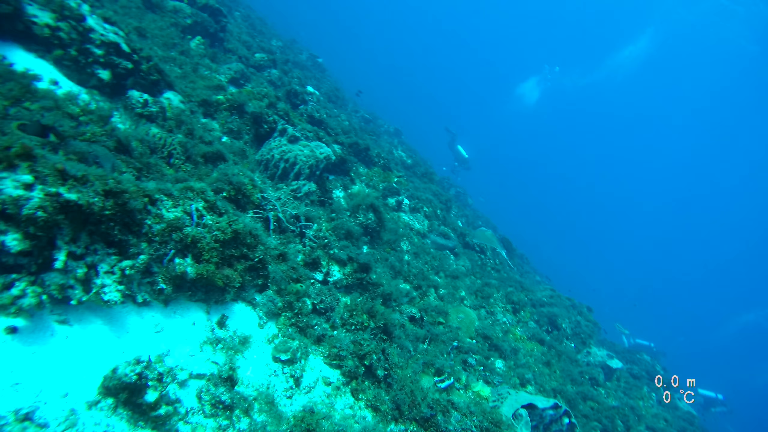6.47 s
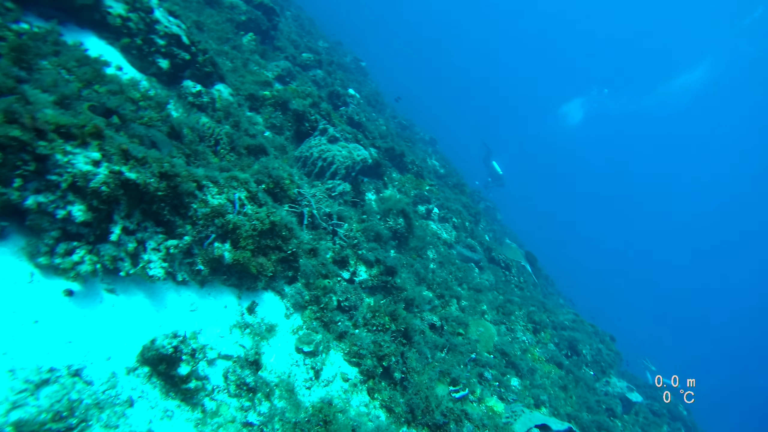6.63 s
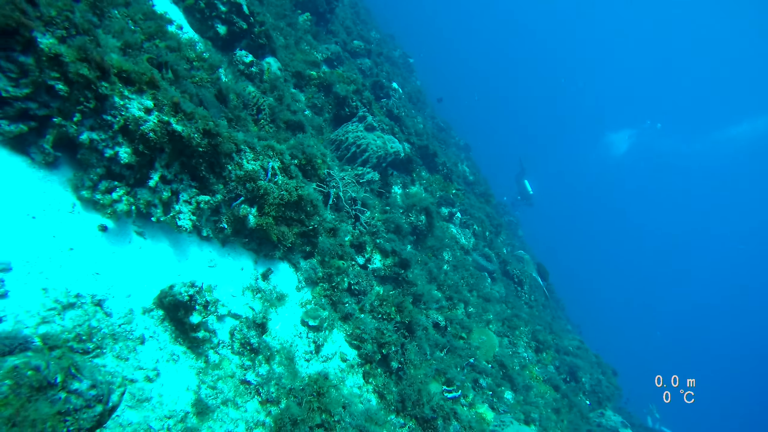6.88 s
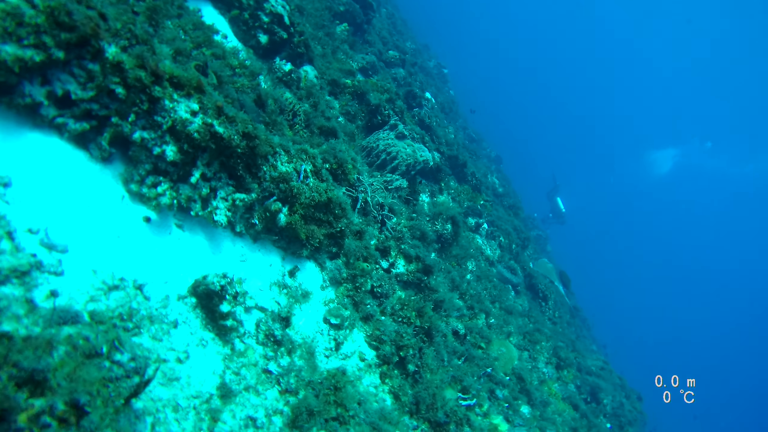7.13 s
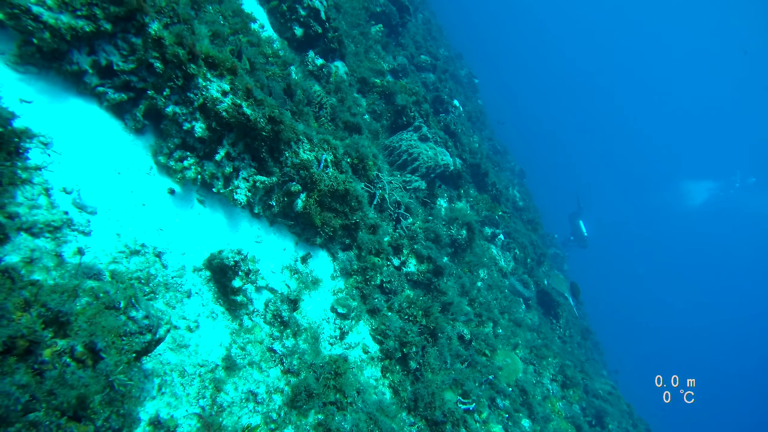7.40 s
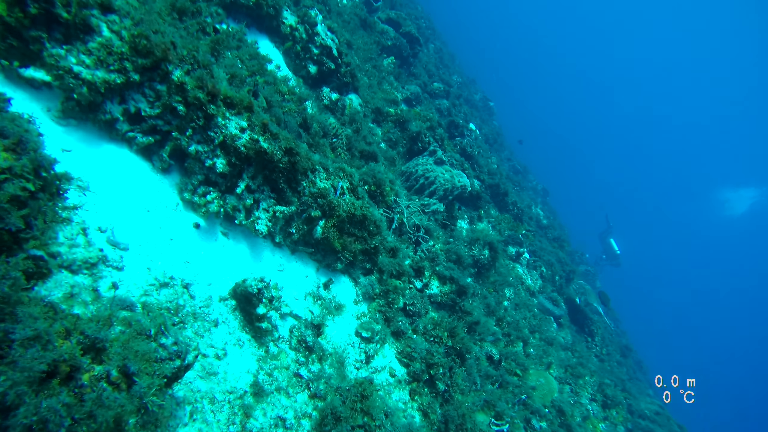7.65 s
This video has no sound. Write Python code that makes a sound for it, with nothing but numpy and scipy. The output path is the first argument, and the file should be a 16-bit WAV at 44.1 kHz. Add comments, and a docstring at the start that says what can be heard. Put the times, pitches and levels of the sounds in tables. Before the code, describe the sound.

From 0 s a quiet reef crackle is already running: thousands of distant shrimp snaps merge into a fine, high fizz, grainier ones sit in the middle distance, and irregular sharp ticks stand out several times a second. Each is a millisecond-short, bright, glassy click coloured by the sealed camera housing. A faint, steady microphone hiss lies beneath. A stronger click comes at about 0.08 s, others near 1.2, 4.1 and 4.8 s; the texture barely changes until 6.4 s, when a light tap touches the shell. At 6.8 s a dull knock brings a deep swaying thump. From 6.9 to 7.25 s fingers rub the housing, with dry scraping and lumpy low rumble. Harder knocks come at 7.36 s, then the loudest, a sharp hollow crack at 7.49 s, followed by another short scrape and small knocks at 7.53 to 7.66 s. The shrimp crackle continues to the end.

```python
"""Snapping shrimp crackle over a fine fizz from the start, with a faint steady hiss beneath.
The place is a reef, the microphone that of a camera in a sealed housing. Each snap is a noise burst of about
a millisecond that rings the housing's treble resonances; distance runs from single clicks to a merged fizz.
Late on, at no distance at all, a hand takes hold of the housing, knocks it, pushes it and rubs along it:
knocks ring decaying shell modes and bounce the mount, pushes sway it, strokes scrape and rumble."""
import sys
import numpy as np
from scipy import signal
from scipy.fft import rfft, irfft, next_fast_len
from scipy.io import wavfile
from scipy.ndimage import map_coordinates

SR = 44100
rng = np.random.default_rng(int(sys.argv[2]) if len(sys.argv) > 2 else 0)


def gain_from_decibels(decibels):
    """Convert decibel values to linear amplitude factors."""
    exponent = np.asarray(decibels, float) / 20
    return 10 ** exponent


def to_wav(s):
    """Save 16-bit WAV."""
    ch = np.atleast_2d(s).T  # columns
    pcm = np.round(np.clip(ch, -1, 1) * 32767)  # PCM
    wavfile.write(sys.argv[1], SR, pcm.astype(np.int16))


N = 342666  # length in samples


def unit(x):
    """Scale to rms 1."""
    return x / np.sqrt(np.mean(x ** 2) + 1e-20)


def wander(rate):
    """A smooth random curve, rate knots a second."""
    knots = rng.standard_normal(round(N * rate / SR) + 4)
    return map_coordinates(knots, [np.arange(N) * rate / SR])


def filtered(x, gain):
    """x through a filter given as a (complex) gain at each frequency in Hz."""
    m = next_fast_len(N + 8192)  # spare room for the rings to die in
    return irfft(rfft(x, m) * gain(np.fft.rfftfreq(m, 1 / SR)), m)[:N]


def coloured(spectrum):
    """Noise of rms 1 with a (Hz, dB) spectrum read on log Hz."""
    f, db = np.transpose(spectrum)

    def gain(hz):
        return gain_from_decibels(np.interp(np.log(hz + 1), np.log(f + 1), db, -120, -120))

    return unit(filtered(rng.standard_normal(N), gain))


def response(modes, f):
    """Causal resonances of alternating sign, at frequencies f."""
    total = 0
    for k, (centre, width, db) in enumerate(modes):
        damping = 1j * f * width
        total = total + (-1) ** k * gain_from_decibels(db) * damping / (centre * centre - f * f + damping)
    return total


def resonate(s, db, life, modes):
    """Noise bursts at times s, swelling and dying with time constant life, each ringing the modes with energy db."""
    k = np.arange(64)
    envelope = (k + 1) ** 2 * np.exp(-k / (life * SR))
    bursts = rng.standard_normal((len(s), len(k))) * envelope
    ringing = rfft(bursts, 128) * response(modes, np.fft.rfftfreq(128, 1 / SR))
    bursts *= (gain_from_decibels(db) / np.linalg.norm(ringing, axis=1))[:, None]
    places = np.round(s * SR).astype(int)[:, None] + k
    drive = np.bincount(places.ravel(), bursts.ravel(), N + SR)[:N]
    return filtered(drive, lambda f: response(modes, f))


# housing resonances that water-borne snaps ring, in groups from low to high: (f/Hz, width/Hz, level/dB)
DEEP_MODES = [(2700, 310, 0)]
LOWER_MODES = [(4760, 1180, -16), (5928, 250, 0), (7370, 600, 0), (8240, 270, 1.5)]
MIDDLE_MODES = [(8770, 890, -13.5), (10057, 310, 1), (11206, 560, -9)]
TOP_MODES = [(13000, 1800, -13.5), (14450, 710, -1), (15300, 500, -5.5)]


def housing(s, levels_db, life):
    """Snaps ring each group of resonances at a strength set by the direction they come from."""
    groups = (DEEP_MODES, LOWER_MODES, MIDDLE_MODES, TOP_MODES)
    return sum(resonate(s, db, life, modes) for db, modes in zip(levels_db, groups))


def crowd(count, scatter_db, tint_db, groups_db, cap_db=np.inf):
    """Random snaps, each tinted by its direction; scatter above 0 makes a few stronger, below 0 a few fainter."""
    s = rng.uniform(0, N / SR, count)
    size = np.minimum(scatter_db * rng.exponential(size=count), cap_db)
    tint = tint_db * rng.standard_normal((count, 4)).T
    return unit(housing(s, size + tint + np.array(groups_db)[:, None], life=0.0001))


def reef():
    """Scattered close snaps, middle-distance ones still heard as grains, far ones that merge into a fizz."""
    close = crowd(count=150, scatter_db=-0.5, tint_db=3, groups_db=[-23, -13.5, 1.5, -1.5])
    grains = crowd(count=3000, scatter_db=1.5, cap_db=9, tint_db=4, groups_db=[-19.5, -12, 0.5, 0.0])
    fizz = crowd(count=20000, scatter_db=-1.5, tint_db=1.5, groups_db=[-23.5, -15, -1.0, -2.0])
    level = gain_from_decibels(-53.5 + 0.24 * wander(2.1))  # the whole reef wanders slowly and slightly
    return level * (gain_from_decibels(-13.5) * close + gain_from_decibels(-4.5) * grains + gain_from_decibels(-2.5) * fizz)


# spectrum of the microphone's own noise: (f/Hz, relative level/dB per Hz)
HISS_SPECTRUM = [(12, -54), (20, 2), (1960, -14), (2630, -12), (3270, -14.5), (4500, -13.5), (5480, -13.5),
                 (6040, -14), (7000, -9), (9100, -35), (15400, -120)]


def microphone_hiss():
    """The microphone's own noise, steady and coloured."""
    return gain_from_decibels(-70.5) * coloured(HISS_SPECTRUM)


# clicks that stand out, the nearest snaps and the treble crack of the hardest knocks:
# (t/s, peak level/dB of the 10 kHz ring, then over that ring: top treble/dB, lower treble/dB, deep ring/dB)
NEAR_SNAPS = [(0.0332, -36.5, 0, -10, -28), (0.0827, -23, -15, -14, -38), (0.172, -37, -2, -17, -36),
              (0.1938, -36, 1, -14, -33), (0.2195, -36.5, 8, -4, -28), (0.2399, -36, 0, -12, -42),
              (0.2653, -39, 5, -11, -34), (0.309, -32, 0, -10, -28), (0.484, -36.5, -4, -9, -35),
              (0.671, -42, 2, -6, -37), (0.6937, -36.5, -3, -17, -36), (0.7523, -37, -4, -0.5, -11),
              (0.8006, -40.5, 0, -19, -38), (0.8305, -38, -1, -20, -35), (0.8391, -35.5, 1, -12, -26),
              (1.0388, -31, -7, -11, -40), (1.0645, -36, -3, -3.5, -41), (1.0767, -48, 7, -15, -30),
              (1.1173, -35, -5, -18, -43), (1.1725, -39, 7, -11, -30), (1.2048, -27, -2, -9, -24),
              (1.228, -51, 11, -12, -29), (1.5935, -37.5, -9, -5, -31), (1.6115, -41, 2, -10, -36),
              (1.7716, -45, 7, 1, -32), (1.889, -37.5, -3, -17, -35), (1.9567, -39, -1, -6, -21),
              (1.9836, -33.5, 3, -9, -36), (1.9969, -47, 9, 5, -20), (2.0165, -38.5, -5, -3, -39),
              (2.0643, -35, -7, -13, -32), (2.202, -34, -1, -5, -38), (2.2322, -37, 0, -6, -25),
              (2.3203, -39, -6, -2, -37), (2.4032, -35, -15, -17, -36), (2.4358, -32, -3, -20, -45),
              (2.484, -49, 9, -9, -28), (2.6227, -34, -7, -25, -44), (2.6736, -38.5, 7, -7, -26),
              (2.8237, -35.5, -7, -21, -42), (2.8915, -42, -1, -6, -36), (2.907, -36, -7, -19, -41),
              (2.9535, -36.5, -1, -5, -37), (2.9651, -41, 0, -14, -30), (2.9916, -30.5, -5, -2.5, -21),
              (3.1444, -36.5, -3, -16, -41), (3.2076, -29, -5, -9.5, -30), (3.3166, -30.5, -6, -6, -40),
              (3.4026, -36, -9, -7.5, -40), (3.5299, -31, -13, -24, -36), (3.6582, -40, 4, -6, -28),
              (3.7056, -39, -7, -12, -39), (3.849, -37, -3, -15, -41), (3.9406, -47, 9, -9, -26),
              (4.1251, -26, -14, -26, -49), (4.3165, -36.5, -10, -26, -44), (4.4115, -41.5, 7, -4, -33),
              (4.4496, -40.5, 3, -8.5, -39), (4.6156, -44, 8, -7, -23), (4.6639, -42, 4, -11, -33),
              (4.678, -40.5, 7, 2, -26), (4.7071, -41, 6, -10, -36), (4.7902, -37, -6, -20, -42),
              (4.7968, -27.5, -4, -15, -33), (4.8734, -37, -9, -7.5, -37), (4.915, -39.5, 6, -8, -34),
              (5.0461, -32, -10, -9.5, -29), (5.103, -33, 1, -7.5, -25), (5.1977, -31.5, -17, -16, -46),
              (5.3484, -44, 8, -3, -17), (5.447, -34, 1, -7, -27), (5.496, -33, 4, -7, -34),
              (5.57, -37.5, 6, -7, -37), (5.597, -35, 1, -16, -41), (5.61, -35, -12, -19, -41),
              (5.7317, -30.5, -11, -22, -48), (5.7935, -39.5, -2, -7, -17), (6.0552, -46, 6, -9, -34),
              (6.1374, -34.5, 3, -7.5, -35), (6.2746, -39, 1, -13, -33), (6.3327, -40.5, 3, -16, -34),
              (6.3878, -41, -10, -3, -6), (6.4059, -34.5, -5, -11, -35), (6.4628, -37, -6, -18, -43),
              (6.4963, -42, -1, -5, -29), (6.5573, -33.5, -7, -5.5, -28), (6.5628, -32, -3, -8, -37),
              (6.5687, -40, 0, -9, -22), (6.6445, -32, -4, -13, -29), (6.6615, -46, -12, 4, -18),
              (6.752, -42, 6, -9, -23), (6.768, -35, -6, -4.5, -35), (6.8688, -41, 6, -18, -33),
              (6.8829, -28.5, -7, -17, -46), (6.9964, -31, -10, -10, -30), (7.0746, -38, 1, -11, -27),
              (7.1485, -39, -5, -20, -37), (7.171, -37.5, -7, -5, -32), (7.3344, -33, -5, -24, -42),
              (7.365, -40, 0, 0.5, -20), (7.3773, -43, 6, -18, -38), (7.4019, -44, 7, -7, -34),
              (7.42, -37, -2, -17, -39), (7.4849, -34, -12, -8, -29), (7.4895, -15, -12, -3.5, -7),
              (7.5349, -30.5, -9, -9, -26), (7.5421, -34, -7, -10, -32), (7.5725, -36.5, -6, 0.5, -16),
              (7.6321, -33, 0, -12, -35), (7.696, -45.5, 8, -7, -34)]


def near_snaps():
    """The single clicks that stand out of the crackle; each starts just before its peak."""
    s, ring_db, top_db, lower_db, deep_db = np.transpose(NEAR_SNAPS)
    levels_db = ring_db + np.array([deep_db, lower_db, 0 * s, top_db])
    peak_to_energy_db = [[33], [28.5], [29.5], [30]]  # peak level to burst energy, set for each group of rings
    return housing(s - 0.0008, levels_db + peak_to_energy_db, life=0.0002)


# hand on the shell, at the housing itself:
# (t/s, ring level/dB before a 5 dB cut, f/Hz where the shell rings most, bounce level/dB)
HAND_KNOCKS = [(6.388, -35.5, 3000, -60), (6.794, -35.5, 1380, -42.5), (6.834, -57, 1300, -56),
               (6.941, -51, 1200, -59), (7.011, -48, 1180, -75), (7.216, -47, 2580, -72),
               (7.359, -37.5, 2180, -85), (7.364, -31, 2500, -65), (7.459, -49, 1500, -76),
               (7.4853, -36, 2000, -75), (7.4888, -16.5, 1800, -38.5), (7.532, -48, 2500, -57),
               (7.54, -45.5, 2490, -61), (7.574, -48, 2590, -58), (7.586, -51, 2570, -55),
               (7.614, -35, 1800, -50), (7.662, -41.5, 1950, -60)]
# the palm sets the mount swaying: (t/s, level/dB)
PALM_PUSHES = [(6.388, -56.5), (6.793, -33), (6.834, -50), (7.012, -66), (7.614, -53)]
# modes of the housing's shell: (f/Hz, relative level/dB, time to fall 60 dB t/s)
SHELL_MODES = [(970, -0.5, 0.0094), (1180, -3, 0.041), (1435, 5, 0.011), (1800, 2, 0.021),
               (2420, 5.5, 0.013), (2835, 6, 0.01), (3380, 1.5, 0.0051), (4210, -1.5, 0.014),
               (4910, 5, 0.0093)]


def knocks():
    """Each knock rings the shell modes near its own pitch and bounces the mount; each push sways it."""
    out, t = np.zeros(N + SR), np.arange(SR // 4) / SR
    hz, level, t60 = np.transpose(SHELL_MODES)[:, :, None]
    sign = (-1) ** np.arange(len(SHELL_MODES))[:, None]
    onset = 1 - np.exp(-t / 0.00049)

    u = t - 0.008  # time from the deepest press
    after = np.maximum(u, 0)
    press = np.exp(-(np.minimum(u, 0) / 0.002) ** 2)
    bounce_hz, bounce_t60 = np.array([[190], [380]]), [[0.082], [0.014]]
    bounce = -press * np.cos(2 * np.pi * bounce_hz * u) * gain_from_decibels(-60 * after / bounce_t60)
    swing = np.cos(np.pi * (after / 0.0073) ** 0.66)  # slows as the grip settles
    sway = -press * swing * gain_from_decibels(-60 * after / 0.113)

    for s, db, centre, bounce_db in HAND_KNOCKS:
        spread_oct = 0.29 + 0.25 * np.log2(centre / 1200)  # sharper knocks reach wider
        lean = -6 * (np.log2(hz / centre) / spread_oct) ** 2
        lean = np.maximum(lean, -15)  # the edge of a knock still reaches modes far from its pitch
        uneven = rng.normal(0, 1.5, hz.shape)
        decay = gain_from_decibels(level + lean + uneven - 60 * t / t60)
        ring = sign * decay * np.sin(2 * np.pi * hz * t) * onset
        out[round(s * SR):][:len(t)] += gain_from_decibels(db - 5) * ring.sum(0)
        upper = 0.9 * (centre / 2300) ** 2  # dull knocks barely reach the upper bounce
        out[round((s - 0.0085) * SR):][:len(t)] += gain_from_decibels(bounce_db) * (bounce[0] + upper * bounce[1])
    for s, db in PALM_PUSHES:
        out[round((s - 0.0085) * SR):][:len(t)] += gain_from_decibels(db) * sway
    return out[:N]


# fingers sliding: (start t/s, length t/s, scrape level/dB, rumble level/dB), levels at full contact
FINGER_STROKES = [(6.385, 0.076, -88, -71), (6.798, .15, -77, -68), (6.919, 0.058, -67, -67),
                  (6.988, 0.05, -66, -73), (7.032, 0.17, -62, -63.5), (7.17, 0.078, -60.5, -69),
                  (7.512, .1, -61, -71), (7.6, 0.059, -72, -71)]
# handling rumble: (f/Hz, relative level/dB per Hz)
RUMBLE_SPECTRUM = [(10, -13), (25, -8), (80, -11), (180, -15.5), (280, -23.5), (500, -31)]


def rub():
    """Skin slips in dense tiny jerks over the shell, and the grip's tremor rumbles in lumps."""
    t = np.arange(N) / SR
    start, length, scrape_db, rumble_db = np.transpose(FINGER_STROKES)[:, :, None]
    grip_s, let_go_s = 0.042, 0.017  # rise and fall of a stroke
    ramps = np.minimum((t - start) / grip_s, (start + length - t) / let_go_s)
    contact = np.clip(ramps, 0, 1) ** 2

    slips_from = 6.7  # s; any earlier stroke only rumbles
    s = rng.uniform(slips_from, N / SR, 1500)
    damped = []
    for hz, db, t60 in SHELL_MODES[:-1]:
        tilt = -10 * abs(np.log2(hz / 2300))
        damped.append((hz, 5 / t60, db + tilt))  # the finger widens the modes
    scrape = resonate(s, 2.9 * rng.exponential(size=len(s)), 0.0001, damped)
    scrape /= scrape[round(slips_from * SR):].std()
    rumble = gain_from_decibels(1.6 * wander(28)) * coloured(RUMBLE_SPECTRUM)
    return (gain_from_decibels(scrape_db) * contact).sum(0) * scrape + (gain_from_decibels(rumble_db) * contact).sum(0) * rumble


def scene():
    """Shrimp, microphone noise and hand, in one channel."""
    mix = reef() + microphone_hiss() + near_snaps() + knocks() + rub()
    return mix[None]


def band_limit(x):
    """A steep low-pass at the top of the band."""
    return signal.sosfilt(signal.butter(12, 16580, fs=SR, output="sos"), x)


def record(dry):
    """A sharp band edge with a weak, falling shelf above it."""
    edge_hz = 15300

    def band(hz):
        return np.where(hz < edge_hz, 1, gain_from_decibels(-13.5 - 0.011 * (hz - edge_hz)))

    limited = filtered(dry[0], band)[None]
    return band_limit(limited)


dry = scene()
out = record(dry)
to_wav(out)
```